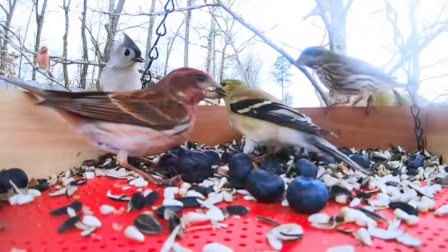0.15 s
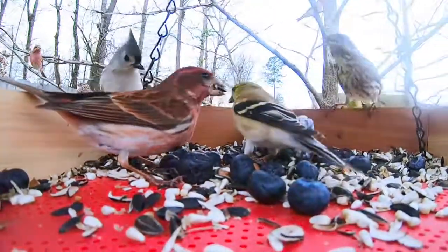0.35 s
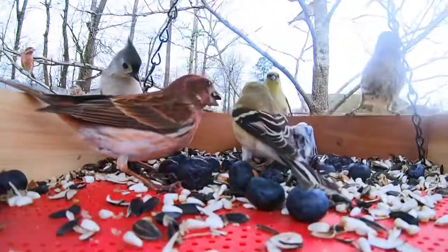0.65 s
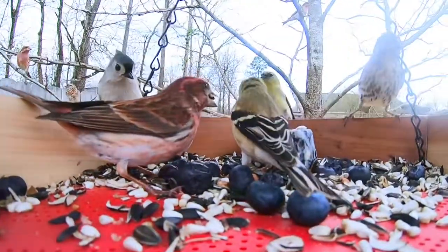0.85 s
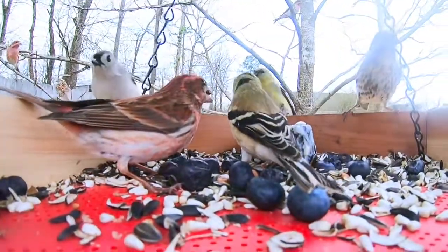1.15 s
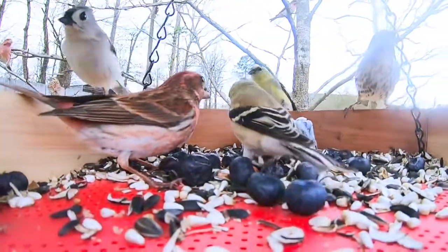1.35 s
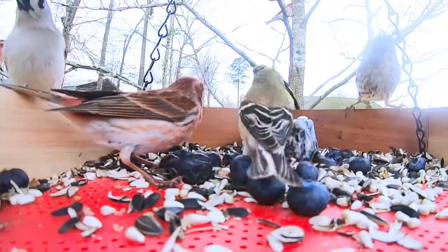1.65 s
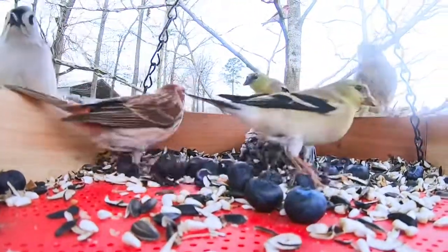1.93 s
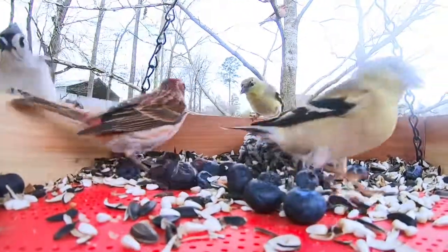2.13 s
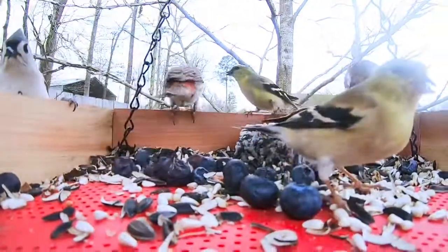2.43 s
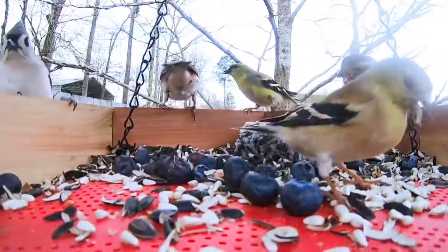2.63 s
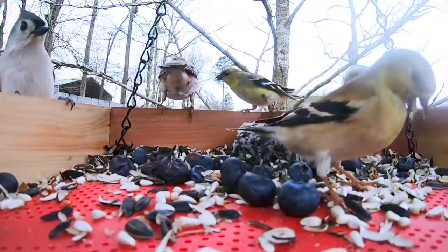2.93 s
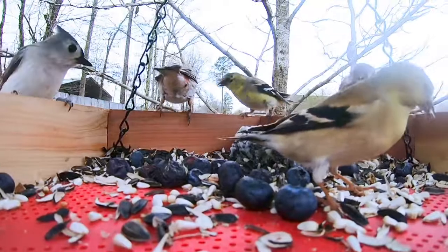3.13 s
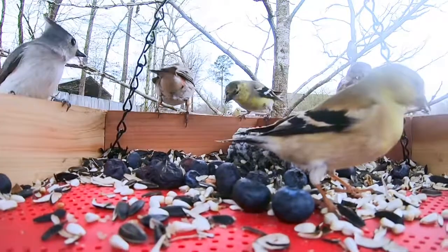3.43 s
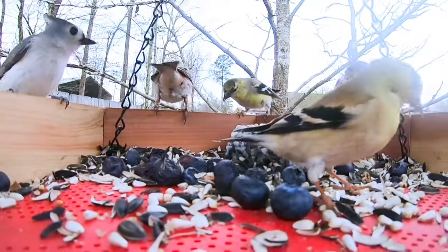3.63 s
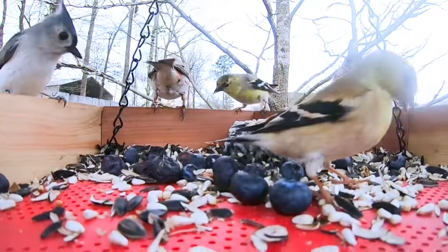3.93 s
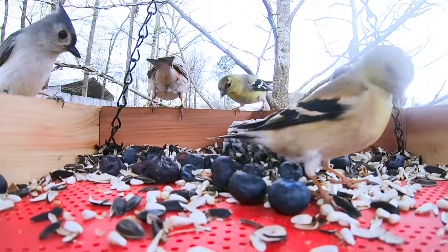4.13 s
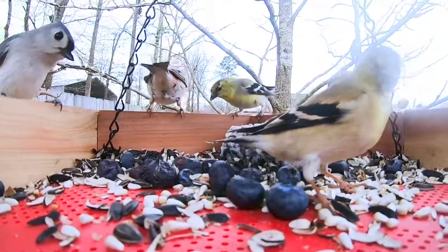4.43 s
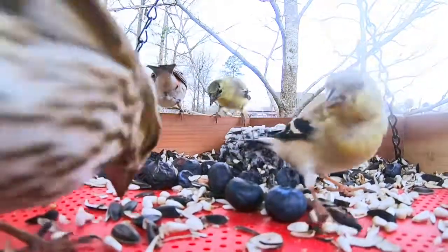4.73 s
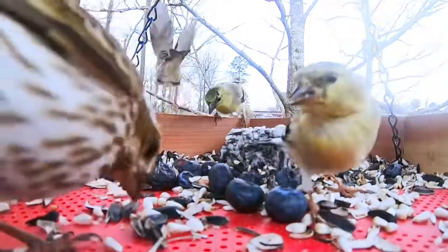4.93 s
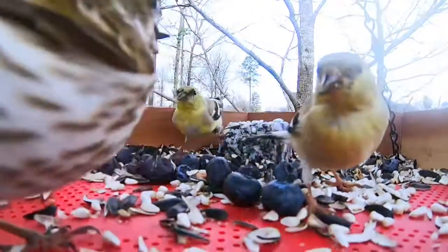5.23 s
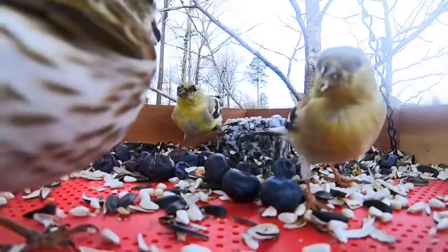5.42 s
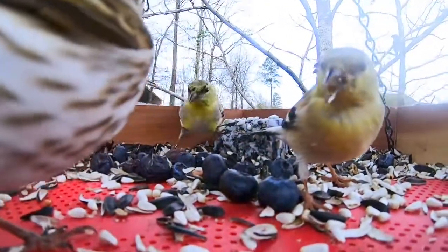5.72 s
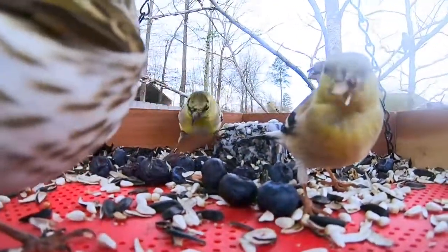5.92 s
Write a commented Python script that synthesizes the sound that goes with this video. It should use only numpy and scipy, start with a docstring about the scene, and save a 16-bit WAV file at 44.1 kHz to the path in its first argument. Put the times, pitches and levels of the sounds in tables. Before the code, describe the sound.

Very close to the microphone, finches feed on a hanging plastic tray in quiet woods. Wing puffs and soft slurred whistles from far birds open it, then seed rustle, husk cracks and sharp chips. A brief trilled buzz near two seconds comes with low thumps and knocks, followed by a run of clean tiks. Cracking and hopping continue, with a last wing stroke and thump near five seconds, and chips at the end.

```python
"""Finches feed on a hanging plastic tray, centimetres from a small camera fixed to it, in quiet woods.
From 0 s: noise of the woods, far whistles (gliding sines), hops and seed shuffle (filtered noise and grains).
Wing puffs, claw scratches and two-voiced chips follow at once; then short bright noise bursts, mostly husk
cracks, and ringing knocks. One trilled buzz comes at 1.85 s, low thumps from 1.9 s, clean tiks from 2.1 to 3.5 s.
Bursts, knocks and hops run on to the end, with a last wing stroke and thump near 5 s and chips to 6 s."""
import sys
import numpy as np
from scipy import signal
from scipy.fft import rfft, irfft, next_fast_len
from scipy.io import wavfile
from scipy.ndimage import uniform_filter1d

SR = 44100
rng = np.random.default_rng(int(sys.argv[2]) if len(sys.argv) > 2 else 0)


def digitize_waveform(pressure):
    """Quantize a signal to 16-bit integers and store it at the path in sys.argv[1].

    Rows of a 2-D input are taken as channels; values are limited to [-1, 1].
    """
    field = np.atleast_2d(pressure).T
    bounded = np.clip(field, -1, 1)
    quanta = np.round(bounded * 32767).astype(np.int16)
    wavfile.write(sys.argv[1], SR, quanta)


N = 267731
TIME = np.arange(N) / SR  # s


def undb(db):
    """Decibels to gain."""
    return 10 ** (np.asarray(db) / 20)


def unit(x):
    """Scale to rms 1."""
    return x / np.sqrt(np.mean(x ** 2))


def curves(table, t=TIME):
    """Columns of a table, joined by straight lines in time."""
    s, *columns = np.transpose(table)
    return [np.interp(t, s, column) for column in columns]


def sides(pan_db):
    """Left and right gains pan_db apart (positive: left louder), with mean 1."""
    gains = undb(np.array([[0.5], [-0.5]]) * pan_db)
    return gains / gains.mean(axis=0)


def add(out, start_s, sound):
    """Mix a stereo sound in at a time."""
    i = max(int(start_s * SR), 0)
    out[:, i:i + sound.shape[1]] += sound[:, :max(N - i, 0)]


def colour(x, points):
    """Causal minimum-phase filter through (Hz, dB) points, from the cepstrum of the log gain."""
    n = next_fast_len(x.shape[-1], True)
    hz, db = np.transpose(points)
    bin_hz = np.arange(n // 2 + 1) * SR / n
    gain_db = np.interp(np.log(bin_hz + 1), np.log(hz), db)
    cepstrum = irfft(np.log(undb(gain_db)), n)
    # fold the cepstrum onto positive time
    cepstrum[1:n // 2] *= 2
    cepstrum[n // 2 + 1:] = 0
    response = np.exp(rfft(cepstrum))
    return irfft(rfft(x, n) * response, n)[..., :x.shape[-1]]


def walk(rate_hz, n=N):
    """Random values at rate_hz, joined by straight lines; spread near 1."""
    steps = np.arange(n) / SR * rate_hz
    count = int(steps[-1]) + 2
    return np.interp(steps, np.arange(count), rng.standard_normal(count))


def pair(likeness, n=N):
    """Left and right noise with a given correlation."""
    mid, side = rng.standard_normal((2, n))
    c = np.clip(likeness, -1, 1)
    return np.sqrt((1 + c) / 2) * mid + np.sqrt((1 - c) / 2) * side * np.array([[1], [-1]])


def turn(hz):
    """Phase in radians of a tone of moving pitch."""
    return 2 * np.pi * np.cumsum(hz) / SR


def bouts(rows, attack_s, decay_s, rest_db):
    """Gain of (start s, length s, dB) bouts: swell up to start, hold, die away; their powers add."""
    power = undb(rest_db) ** 2
    for s, length_s, db in rows:
        rise = np.clip(1 + (TIME - s) / attack_s, 0, 1)
        fall = np.exp(-np.maximum(TIME - s - length_s, 0) / decay_s)
        power = power + (undb(db) * rise * fall) ** 2
    return np.sqrt(power)


def strays(activity, above_db, most_db, count):
    """Small contacts at random moments, stronger while the birds move: rows of (s, dB)."""
    slots = (np.arange(count) + rng.random(count)) / count
    at = (slots * (N - 1)).astype(int)
    level_db = 20 * np.log10(activity[at]) + above_db
    return zip(at / SR, np.minimum(level_db, most_db))


def grains(rate_hz, spread_db, length_s, likeness):
    """Noise in a stream of tiny rubbing contacts, many weak and a few strong."""
    contact = rng.random(N) < rate_hz / SR
    strength = undb(spread_db * np.minimum(rng.exponential(size=N), 4)) * contact
    power = signal.lfilter([1], [1, -np.exp(-2 / (length_s * SR))], strength ** 2 + 1e-9)
    smoothed = uniform_filter1d(power, size=64)  # each grain has a soft onset, smoothed over 1.5 ms
    return pair(likeness) * np.sqrt(np.abs(smoothed))


def echo(x, t60_s, wet_db):
    """Scattered reflections that die away, alike on both sides."""
    t = TIME[:SR // 2]
    tail = pair(1.0, len(t)) * np.exp(-np.log(1000) * t / t60_s) * (t > 0.002)
    tail /= np.sqrt(np.sum(tail ** 2) / 2)
    return x + undb(wet_db) * signal.fftconvolve(x, tail, axes=1)[:, :N]


# Spectrum of the woods. Each row: frequency in Hz, relative density in dB per Hz.
WOODS_SPECTRUM = [(25, 1.5), (70, -4.5), (190, 5.5), (290, 1), (420, -37.5), (700, -16), (1100, -22.5),
                  (1900, -12), (3100, -17.5), (4500, -29), (9500, -30), (13000, -39), (16000, -87)]


def woods(level_db=-59):
    """Soft, even hush of the trees and far-off roads: filtered noise, slowly swelling."""
    swell_db = 1.2 * walk(3)
    return unit(colour(pair(0.81), WOODS_SPECTRUM)) * undb(level_db + swell_db)


# A far bird's repeated falling slur. Each row: start in s, length in s, first pitch in Hz,
# level in dB before gain_db.
FALLING_SLURS = [(0, 0.029, 3644, -38.5), (0.166, 0.055, 3800, -42.5), (0.786, 0.032, 3340, -53),
                 (0.852, 0.067, 3100, -52), (0.907, 0.048, 3190, -54), (1.045, .035, 2980, -54),
                 (1.175, 0.045, 3240, -56), (2.933, .048, 3160, -58), (3.184, 0.047, 3020, -56.5),
                 (3.377, 0.026, 3260, -55), (4.706, 0.059, 3100, -54), (4.871, 0.033, 3150, -53),
                 (5.159, 0.028, 3170, -53), (5.28, 0.041, 3100, -58), (5.581, 0.038, 3160, -57),
                 (5.7, 0.053, 3050, -56.5), (5.83, 0.054, 3130, -57)]
SLUR_FALL_OCTAVES_PER_S = 9.3
# Other far birds' gliding notes. Each row: start in s, length in s, first pitch in Hz, last pitch in Hz,
# level in dB before gain_db.
FAR_NOTES = [(0.356, 0.051, 1680, 1840, -51.5), (0.675, 0.12, 1705, 2000, -53),
             (2.58, 0.066, 7800, 7660, -52), (2.575, 0.034, 8550, 8400, -60),
             (2.644, 0.051, 7800, 7760, -65), (2.647, 0.032, 8600, 8400, -56),
             (2.919, 0.1, 5350, 5300, -67), (2.862, 0.79, 1900, 1878, -64.5),
             (3.48, 0.074, 4440, 4270, -67), (4.091, 0.032, 3450, 3800, -57),
             (4.533, 0.034, 4040, 4280, -50), (5.7, 0.155, 3650, 3630, -63),
             (5.908, 0.028, 4120, 4500, -53)]


def whistles(waver=0.017, gain_db=-1):
    """Pure notes from the trees: sines gliding in pitch, slightly unsteady in pitch and level."""
    out = np.zeros((2, N))
    slurs = []
    for s, length_s, hz, db in FALLING_SLURS:
        last_hz = hz / 2 ** (SLUR_FALL_OCTAVES_PER_S * length_s)
        slurs.append((s, length_s, hz, last_hz, db))
    for s, length_s, first_hz, last_hz, db in slurs + FAR_NOTES:
        u = np.linspace(0, 1, int(length_s * SR))
        glide_hz = first_hz * (last_hz / first_hz) ** u
        pitch_hz = glide_hz * (1 + waver * walk(600, len(u)))
        flicker_db = 2.5 * walk(120, len(u))
        swell = np.sqrt(4 * u * (1 - u)) * undb(db + gain_db + flicker_db)
        add(out, s, np.sin(turn(pitch_hz)) * swell * sides(0))
    return out


# A bird hops or shifts its feet among the seeds. Each row: start in s, length in s,
# then, before the gains of the sounds they drive, tray wobble in dB, husk rustle in dB, tray scrape in dB.
HOP_BOUTS = [(0.012, 0.21, -49.5, -57, -60), (0.48, 0.12, -43.5, -56, -50.5), (0.865, 0.03, -48, -62, -74),
             (1.077, 0.022, -69, -57, -57), (1.163, 0.15, -46, -57.5, -60),
             (1.34, 0.24, -41.5, -57.5, -59.5), (1.642, 0.16, -38, -52, -54),
             (1.85, 0.052, -40.5, -45, -45), (1.946, 0.14, -36.5, -51, -53.5),
             (2.16, 0.086, -33.5, -48.5, -45), (2.27, 0.29, -40, -56.5, -58), (2.614, 0.058, -41, -66, -57),
             (2.87, 0.039, -52, -56.5, -62.5), (3.059, 0.023, -57, -53, -57),
             (3.552, 0.06, -42.5, -62.5, -54), (3.734, 0.12, -48, -64, -60.5), (4.05, 0.12, -77, -63, -74),
             (4.437, 0.42, -46, -55.5, -56), (4.688, 0.17, -35, -56, -57), (4.968, 0.15, -33, -54, -52.5),
             (5.176, 0.36, -61, -61.5, -65.5), (5.46, 0.042, -44, -59.5, -52),
             (5.627, 0.018, -42, -58.5, -56), (5.822, 0.11, -47, -61.5, -58.5),
             (6.045, .05, -47, -73, -62.5)]
HOP_ATTACK_S, WOBBLE_DECAY_S, SEEDS_SETTLE_S = 0.048, 0.068, 0.052
RESTING_WOBBLE_DB, RESTING_HUSK_DB, RESTING_SCRAPE_DB = -70, -67, -70.5  # while the birds sit and chew


def movement():
    """Gains by which hops wobble the tray, stir husks and scrape plastic; seeds settle before the tray."""
    s, length_s, wobble_db, husk_db, scrape_db = np.transpose(HOP_BOUTS)
    wobble = bouts(zip(s, length_s, wobble_db), HOP_ATTACK_S, WOBBLE_DECAY_S, RESTING_WOBBLE_DB)
    stirring = bouts(zip(s, length_s, husk_db), HOP_ATTACK_S, SEEDS_SETTLE_S, RESTING_HUSK_DB)
    scraping = bouts(zip(s, length_s, scrape_db), HOP_ATTACK_S, SEEDS_SETTLE_S, RESTING_SCRAPE_DB)
    return wobble, stirring, scraping


# Filter of husk on husk. Each row: frequency in Hz, relative gain in dB.
HUSK_FILTER = [(1200, -31.5), (2200, 0.5), (3200, 2), (4500, -1.5), (7000, -5), (9700, -5.5),
               (11000, -13.5), (13500, -15), (16000, -56)]
# Filter of seeds and claws on plastic. Each row: frequency in Hz, relative gain in dB.
SCRAPE_FILTER = [(150, -32.5), (300, 8), (450, -2), (650, -2), (950, -3), (1400, 2), (2100, -4.5),
                 (3200, -7.5), (6000, -41.5)]


def shuffling(stirring, scraping, husk_gain_db=1, scrape_gain_db=3.0):
    """Husks tick against each other and scrape on the plastic, in uneven clusters."""
    husk_grains = grains(rate_hz=600, spread_db=4.5, length_s=0.004, likeness=0.36)
    scrape_grains = grains(rate_hz=400, spread_db=4.2, length_s=0.004, likeness=-0.35)
    husks = unit(colour(husk_grains, HUSK_FILTER)) * stirring * undb(husk_gain_db)
    scrape = unit(colour(scrape_grains, SCRAPE_FILTER)) * scraping * undb(scrape_gain_db)
    cluster_db = 3 * walk(45)
    return (husks + scrape) * undb(cluster_db)


# Spectrum of the wobbling tray. Each row: frequency in Hz, relative density in dB per Hz.
SHAKE_SPECTRUM = [(20, -2), (40, 0), (65, 4), (88, -1.5), (106, 7), (130, -2), (200, -15), (300, -15),
                  (450, -28.5), (800, -39), (2000, -64)]


def shaking(wobble, gain_db=0.0, pan_db=13):
    """The hanging tray wobbles and rumbles through the camera body, mostly into the left microphone."""
    rumble = unit(colour(pair(-0.036), SHAKE_SPECTRUM))
    flicker_db = 3 * walk(30)
    return rumble * wobble * undb(gain_db + flicker_db) * sides(pan_db)


# Wing flutter close by. Each row: start in s, length in s, level in dB before gain_db.
FLUTTER_BOUTS = [(.06, 0.036, -30.5), (.14, 0.18, -36), (.418, 0.031, -33), (.51, 0.12, -46),
                 (1.3, 0.23, -54.5), (1.73, 0.033, -49), (1.9, 0.67, -49), (4.99, 0.092, -41.5),
                 (5.08, 0.14, -45.5), (5.45, 0.49, -56.5), (6.045, .025, -44)]
FLUTTER_ATTACK_S, FLUTTER_DECAY_S = 0.039, 0.032
# Spectrum of the flutter. Each row: frequency in Hz, relative density in dB per Hz.
FLUTTER_SPECTRUM = [(20, -16), (40, 7), (80, 0), (140, 1), (220, -4.5), (300, -5.5), (450, -20.5),
                    (800, -26.5), (2000, -21.5), (5000, -50.5)]
# Puffs of air from wing strokes. Each row: time in s, level in dB before puff_db.
WING_PUFFS = [(0.056, -31), (.073, -26), (.21, -18), (.295, -22), (0.416, -16.5), (0.432, -34), (.453, -26),
              (5.001, -14.5), (5.042, -17.5)]


def wings(push_hz=110, length_s=0.0016, puff_db=-1, eddy_db=2, gain_db=-1):
    """Feathers stir the air at both ports alike; a strong stroke pushes one brief swing of pressure."""
    effort = bouts(FLUTTER_BOUTS, FLUTTER_ATTACK_S, FLUTTER_DECAY_S, rest_db=-69.0)
    air = unit(colour(pair(1.0), FLUTTER_SPECTRUM))
    out = air * effort * undb(gain_db + eddy_db * walk(50))
    t = np.arange(4096) / SR
    for s, db in WING_PUFFS:
        wander = 0.25 * walk(205, len(t))
        swell = t / length_s * np.exp(1 - t / length_s)
        swing = np.sin(turn(push_hz * np.exp(wander))) * swell
        add(out, s, swing * undb(db + puff_db) * sides(0))
    return out


# Claws scrabble for a grip. Each row: start in s, length in s, level in dB before gain_db.
CLAW_SCRATCHES = [(.07, .05, -50), (.535, 0.021, -46), (2.15, 0.071, -43.5), (3.545, 0.013, -46),
                  (4.675, 0.032, -42), (4.823, 0.0063, -40), (5.034, 0.042, -40)]


def scratches(attack_s=0.0033, decay_s=0.0038, gain_db=0):
    """A claw drags through the seeds and over the plastic in a short, dense rasp."""
    contacts = grains(rate_hz=900, spread_db=3.5, length_s=0.002, likeness=-0.3)
    rasp = unit(colour(contacts, SCRAPE_FILTER))
    return rasp * bouts(CLAW_SCRATCHES, attack_s, decay_s, rest_db=-np.inf) * undb(gain_db)


# Squabbling chips. Each row: centre in s, length in s (the swell spans 1.3 of it), pitch in Hz, sweep in Hz,
# arch in Hz, level in dB before gain_db, second voice in dB, octave in dB, twelfth in dB,
# roughness as a factor, left minus right in dB.
CHIP_CALLS = [(0.084, 0.018, 2830, -200, 100, -42, 1, -12, -26, 0.95, 0),
              (.107, 0.029, 2520, 150, 200, -31, -10, -24, -21, 0.9, -1),
              (0.269, 0.013, 3480, 245, 200, -41.5, -8, -13, -22, .4, 0),
              (0.499, .016, 2390, 298, 200, -38.5, -5, -29, -30, 0.7, -4),
              (.544, 0.014, 2940, -400, 200, -36.5, -7, -27, -24, 0.97, -2),
              (1.436, 0.022, 3174, 0, 280, -23.5, -8.5, -17, -15, 0.42, 4.5),
              (1.631, 0.014, 3580, 100, 60, -30, -14, 0, -15, 0.15, 4),
              (1.665, 0.018, 3360, -2, 150, -28.5, -2, -13, -7, 0.43, 0),
              (1.811, 0.011, 3770, 0, 200, -40, -12, -7, -10, 0.4, 1),
              (1.952, 0.01, 3500, -200, 200, -32, -7, -17, -17, 0.6, 2),
              (2.009, 0.018, 3650, 448, 200, -25, -17, -7, -25, 0.3, 4),
              (2.195, 0.02, 3290, -270, 200, -35, -6, -16, -8, 1, 2),
              (2.264, 0.011, 3380, 112, 200, -42, -10, -16, -18, 0.46, -1),
              (4.624, 0.014, 1940, -450, 100, -36.5, -7, -9.5, -19, 1.22, 1),
              (4.986, 0.016, 3300, 450, 650, -36, -11, -2, -4, 0.2, 4),
              (5.04, 0.017, 3280, -400, 200, -37, 0, -10, -12, 0.5, -1),
              (5.065, 0.021, 2960, -160, 100, -37.5, -9, -10, -17, 0.75, -3),
              (5.135, .016, 3220, 250, 350, -42, -16, -10, -12, 0.25, 5),
              (5.209, 0.016, 3210, 150, 300, -50, -18, -15, -15, 0.1, 9),
              (5.983, 0.014, 2850, 750, 250, -30.5, -2, -33, -24, 0.35, -3.5),
              (6.036, 0.0076, 2590, 30, 150, -33, -11, -26, -38, 0.3, -7)]
# One bird's run of short clean tiks. Each row: centre in s, length in s (the swell spans 1.3 of it),
# pitch in Hz, level in dB before gain_db.
TIK_CALLS = [(2.087, 0.0095, 3500, -30.5), (2.353, 0.0073, 3460, -43), (2.427, 0.0089, 3440, -27),
             (2.495, 0.0076, 3500, -26), (2.557, 0.01, 3410, -24.5), (2.64, 0.014, 3490, -23),
             (2.774, 0.0083, 3380, -26.5), (2.848, 0.01, 3450, -18.5), (2.916, .012, 3390, -18.5),
             (3.097, .012, 3375, -25), (3.179, 0.01, 3410, -32), (3.456, 0.0067, 3460, -33)]
TIK_SECOND_DB, TIK_OCTAVE_DB, TIK_TWELFTH_DB, TIK_ROUGH, TIK_PAN_DB = -12, -20.5, -32, 0.41, 3


def chips(split_hz=380, tik_sweep_hz=-200, tik_arch_hz=330, side_db=-5, jitter=0.063, rasp_db=-17,
          gain_db=-1):
    """Syrinx sides sound apart and modulate each other; roughness shakes pitch, rasps, breaks overtones."""
    out = np.zeros((2, N))
    tiks = [(s, length_s, hz, tik_sweep_hz, tik_arch_hz, db,
             TIK_SECOND_DB, TIK_OCTAVE_DB, TIK_TWELFTH_DB, TIK_ROUGH, TIK_PAN_DB)
            for s, length_s, hz, db in TIK_CALLS]
    for call in tiks + CHIP_CALLS:
        s, length_s, hz, sweep_hz, arch_hz, db, second_db, octave_db, twelfth_db, rough, pan_db = call
        u = np.linspace(-1, 1, int(1.3 * length_s * SR))
        contour_hz = hz + sweep_hz * u / 2 + arch_hz * (0.15 - u ** 2)
        pitch_hz = contour_hz * (1 + jitter * rough * walk(917, len(u)))
        main = turn(pitch_hz) + np.array([[0], [0.74]])  # right leads by 0.74 rad
        beat = turn(split_hz * (1 + 0.17 * walk(190, len(u)))) + rng.uniform(0, 2 * np.pi)
        voices = []
        for k in (1, 2, 3):
            second = np.sin(k * main + beat) + undb(side_db) * np.sin(k * main - beat)
            voices.append(np.sin(k * main) + undb(second_db) * second)
        tone, octave, twelfth = voices
        for part, part_db in [(octave, octave_db), (twelfth, twelfth_db)]:
            tone = tone + part * undb(part_db + 8 * rough * walk(700, len(u)))
        rasp = rough * undb(rasp_db) * unit(colour(pair(0.69, len(u)), HUSK_FILTER))
        swell = np.cos(np.pi * u / 2) ** 1.42
        add(out, s - len(u) / SR / 2, (tone + rasp) * swell * undb(db + gain_db) * sides(pan_db))
    return out


# Short bright noise bursts: husk cracks, and the bright edge of a chip near 1.66 s.
# Each row: time in s, level in dB before gain_db, body below about 4.3 kHz in dB before body_gain_db.
BRIGHT_BURSTS = [(0.6627, -23, -23), (0.8354, -36.5, 4.5), (0.8948, -36.5, -5), (1.034, -38.5, -4),
                 (1.0481, -34.5, -3.5), (1.1741, -38, -28), (1.275, -37, -1.5), (1.4734, -40.5, -25),
                 (1.579, -49, 4), (1.588, -47, 5), (1.6392, -21.5, -11), (1.6578, -29, -19),
                 (1.6611, -22, -8.5), (1.695, -38.5, -6.5), (1.721, -30, -7.5), (1.7405, -31.5, -5),
                 (1.8193, -29.5, -13), (1.964, -32.5, -1), (2.072, -34, 1), (2.141, -39, -21),
                 (2.172, -32, -17), (2.1995, -34, -3), (2.571, -29.5, -14), (2.616, -28, -9),
                 (2.8598, -42, -8), (2.8828, -31, -7.5), (2.979, -49.5, -6), (3.046, -29.5, -6.5),
                 (3.2745, -34.5, 0.5), (3.3752, -45, -9), (3.4365, -43, -8), (3.6582, -22, -8.5),
                 (3.6776, -30, -13), (3.8165, -51, -14), (3.8314, -25.5, -15), (3.8883, -38.5, -25),
                 (3.9764, -44, -21), (3.9895, -26, -15.5), (4.1849, -44, -6), (4.2038, -43, -25),
                 (4.336, -43.5, -5.5), (4.4468, -39.5, -2.5), (4.5762, -41, -7), (4.8889, -47.5, 7.5),
                 (5.028, -28.5, -3), (5.102, -51, -3), (5.273, -41, -13), (5.3931, -44, -4),
                 (5.46, -47, -14), (5.508, -24.5, -17), (5.6885, -47, -16), (5.8161, -36, -1),
                 (5.953, -47.5, -1)]
# Filter of a burst. Each row: frequency in Hz, relative gain in dB.
CRACK_FILTER = [(300, -20), (1200, -2), (2200, 11.5), (3100, 19.5), (4200, 13.5), (6000, 15), (9500, 14),
                (11000, 8.5), (13500, 6.5), (16000, -14)]
SNAP_S = 0.001  # decay time of the snap


def cracks(stirring, nibble_body_db=-5, tail_s=0.0061, tail_db=-19, onset_s=0.0027, onset_db=-18,
           splinter_db=4, husk_db=1.5, body_gain_db=9, gain_db=-9):
    """A crack swells in softly, then snaps in a noise burst with a short tail. Faint nibbles between."""
    out = np.zeros((2, N))
    t = np.arange(-512, 2048) / SR
    after = np.maximum(t, 0)
    hz, shape_db = np.transpose(CRACK_FILTER)
    nibbles = [(s, db, nibble_body_db)
               for s, db in strays(stirring, above_db=15, most_db=-51, count=22)]
    for s, db, body_db in BRIGHT_BURSTS + nibbles:
        snap = np.exp(-after / SNAP_S) + undb(tail_db) * np.exp(-after / tail_s)
        snap *= 1 - np.exp(-after / 0.00011)
        onset = undb(onset_db) * np.exp(-np.abs(t) / onset_s)
        burst = pair(0, len(t)) * (snap + onset) * undb(splinter_db * walk(2525, len(t)))
        burst /= np.sqrt(np.sum(burst ** 2) / 2 / (SR / 1000))  # energy of 1 ms at rms 1
        # every burst has its own colour, as seeds differ in size
        body = (body_db + body_gain_db) / (1 + (hz / 4300) ** 6)
        own_db = shape_db + husk_db * rng.standard_normal(len(hz)) + body
        pan_db = 0.9 + 1.0 * rng.standard_normal()
        crack = colour(burst, np.c_[hz, own_db])
        add(out, s + t[0] + 0.0007, crack * undb(db + gain_db) * sides(pan_db))
    return out


# Feet and beaks strike the tray. Each row: time in s, level in dB before gain_db,
# boom in dB before boom_gain_db, clack in relative dB.
TRAY_KNOCKS = [(.408, -42, -7, 4.5), (.453, -42, -8, 1.5), (.586, -41, 5, -1), (1.151, -44, 6, -5),
               (1.4071, -37, -7, -8), (1.623, -43.5, 9, 13), (2.0703, -31.5, -1.5, 3), (2.149, -39, 0, -12),
               (2.161, -25.5, -4, -24), (2.372, -19, -5, -5), (2.625, -29.5, -2.5, -26),
               (2.8886, -42.5, 10, 9), (3.5455, -39, 2, -4), (3.709, -38, 4.5, -22),
               (3.8154, -34.5, -8, -11), (3.8687, -38.5, -10, -2), (3.9111, -40.5, -11, -20),
               (4.425, -37, -18, -12), (4.484, -44, -6, -6), (4.621, -37, -25, 10), (4.675, -36, 6, -5),
               (4.6801, -30, 10, -0.5), (4.807, -24.5, 7.5, -22), (4.8277, -28.5, 3.5, -3.5),
               (5.0323, -23.5, 6, -20), (5.424, -41, -11, 2), (5.476, -45, -3, -4), (5.6274, -43.5, 3, -14),
               (5.8662, -44.5, 11, 3)]
# Modes of the tray. Each row: frequency in Hz, relative level in dB, t60 in s.
TRAY_MODES = [(105, -11, 0.068), (189, -2.5, 0.11), (261, 3.5, 0.1), (342, -1, 0.082), (430.5, 5.5, 0.044),
              (626, -5, 0.018), (688, -8.5, 0.11), (790, 4.5, 0.013), (1020, -0.5, 0.011),
              (1204, 7.5, 0.016), (1390, 8, 0.016), (1685, 4, 0.0069), (1850, 1, 0.027), (1956, 7, 0.016),
              (2660, -8, 0.005), (2770, 5.5, 0.025), (3484, 4, 0.016), (3930, -16, 0.015),
              (4550, -3, 0.0083)]
CONTACT_S = 0.003  # decay time of a foot or beak's contact with the tray


def knocks(scraping, step_boom_db=-3, step_clack_db=1, grit=0.43, scatter_db=0.0, boom_gain_db=1,
           shake_hz=1100, shake_rad=2.8, crunch_db=3, crunch_s=0.0065, gain_db=-10):
    """A blow crunches seeds and rings the tray, low modes opposite at the ports. Light steps between."""
    out = np.zeros((2, N))
    t = np.arange(8192) / SR
    hz, mode_db, t60_s = np.transpose(TRAY_MODES)[:, :, None]
    low = 1 / (1 + (hz / 900) ** 6)
    high = 1 / (1 + (2150 / hz) ** 8)
    shake = 1 / (1 + (hz / shake_hz) ** 4)
    steps = [(s, db, step_boom_db, step_clack_db)
             for s, db in strays(scraping, above_db=4.5, most_db=-44, count=8)]
    for s, db, boom_db, clack_db in TRAY_KNOCKS + steps:
        level_chance, pitch_chance = rng.standard_normal((2, len(hz), 1))
        ring_db = mode_db + low * (boom_db + boom_gain_db) + high * clack_db + scatter_db * level_chance
        rings = undb(ring_db) * np.exp(-np.log(1000) * t / t60_s)
        phase = 2 * np.pi * hz * (1 + 0.023 * pitch_chance) * t
        phase += np.pi * np.arange(len(hz))[:, None]  # alternate modes start inverted
        left = (rings * (1 + shake) * np.sin(phase)).sum(0)
        right = (rings * np.sin(phase + shake_rad * shake)).sum(0)
        ports = np.array([left, right])
        push = grit * rng.standard_normal(len(t)) * np.exp(-t / CONTACT_S) / np.sqrt(CONTACT_S * SR / 2)
        push[0] += 1
        ring = signal.fftconvolve(ports, push[None])[:, :len(t)]
        ring *= np.linalg.norm(ports) / np.linalg.norm(ring)  # grit spreads the blow, adds no energy
        crunch = undb(crunch_db + 7.6 * walk(507, len(t))) * np.exp(-t / crunch_s)
        seeds = unit(colour(pair(-0.54, len(t)), SCRAPE_FILTER)) * crunch
        onset = 1 - np.exp(-t / 0.00043)
        add(out, s + 0.00056, (ring + seeds) * onset * undb(db + gain_db))
    return out


# The scolding buzz. Each row: time in s, centre pitch in Hz, level in dB before throb and overtones.
BUZZ_CURVE = [(1.847, 1610, -36), (1.851, 1700, -27.5), (1.862, 1860, -27), (1.878, 1912, -24.5),
              (1.902, 1940, -26.5), (1.914, 2010, -34), (1.926, 1740, -36), (1.931, 1750, -60)]


def buzz(trill_hz=133, depth_hz=260, throb=0.3, rough=0.037, pan_db=5):
    """A low note shaking very fast in pitch and strength, wider and brighter as the bird pushes harder."""
    t = np.arange(BUZZ_CURVE[0][0], BUZZ_CURVE[-1][0], 1 / SR)
    hz, db = curves(BUZZ_CURVE, t)
    effort = np.sqrt(undb(db - db.max()))
    trill = np.sin(turn(trill_hz * (1 + 0.039 * walk(84, len(t)))))
    pitch_hz = (hz + depth_hz * effort * trill) * (1 + rough * walk(1505, len(t)))
    phase = turn(pitch_hz) + np.array([[0], [0.8]])
    tone = 0
    for k, part_db in enumerate([-2.0, -9, -12, -16]):
        tone = tone + undb(part_db) * effort ** k * np.sin((k + 1) * phase)
    out = np.zeros((2, N))
    add(out, t[0], tone * (1 + throb * trill) * undb(db) * sides(pan_db))
    return out


# A bird lands or pushes off. Each row: time in s, level in dB before gain_db, centre pitch in Hz, swell in s.
TRAY_THUMPS = [(1.904, -25.5, 48, 0.0096), (1.999, -24, 92.3, .012), (2.259, -29, 74, 0.0085),
               (2.628, -25, 79, 0.0053), (2.66, -35.5, 87, 0.019), (3.554, -27.5, 104, 0.011),
               (3.593, -32.5, 98, 0.023), (5.083, -27, 62.4, 0.022)]


def thumps(pan_db=15, gain_db=0):
    """A landing or push-off swings the tray a few low cycles, mostly into the left microphone."""
    out = np.zeros((2, N))
    t = np.arange(8192) / SR
    for s, db, hz, swell_s in TRAY_THUMPS:
        swell = (t / swell_s * np.exp(1 - t / swell_s)) ** 2
        swing = np.sin(turn(hz * (1 + 0.035 * walk(75, len(t)))))
        add(out, s, swing * swell * undb(db + gain_db) * sides(pan_db))
    return out


def scene():
    """Near birds on the tray, far birds in the trees, and the air."""
    wobble, stirring, scraping = movement()
    far = echo(whistles(), t60_s=0.3, wet_db=-3)
    near = echo(chips() + cracks(stirring) + knocks(scraping) + buzz(), t60_s=0.083, wet_db=-17)
    handling = shuffling(stirring, scraping) + shaking(wobble) + scratches() + thumps()
    return woods() + far + handling + wings() + near


def record(dry):
    """The camera drops the deepest rumble, below 18 Hz, and cuts the top above 16.3 kHz."""
    bass_cut = signal.butter(2, 18, "high", fs=SR, output="sos")
    top_cut = signal.ellip(8, 0.2, 70, 16300, fs=SR, output="sos")
    return signal.sosfilt(np.vstack([bass_cut, top_cut]), dry)


dry = scene()
out = record(dry)
digitize_waveform(out)
```